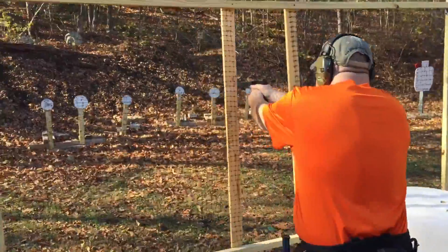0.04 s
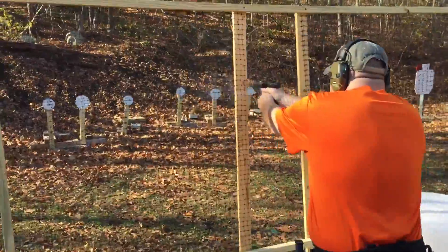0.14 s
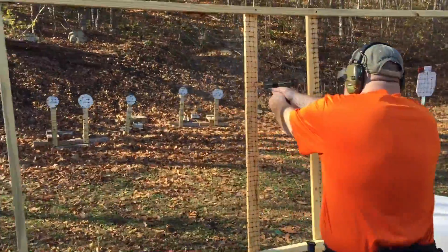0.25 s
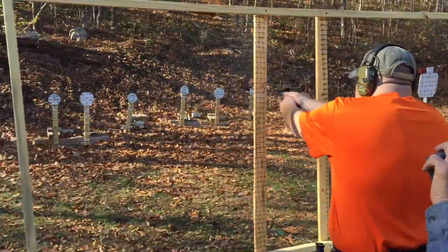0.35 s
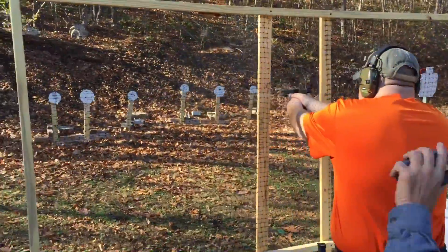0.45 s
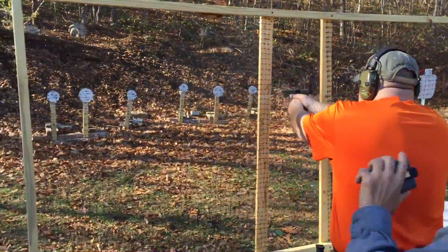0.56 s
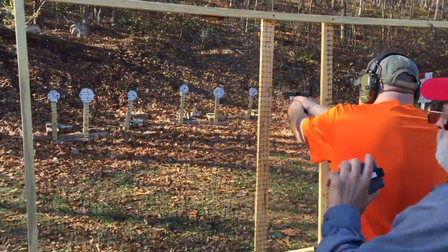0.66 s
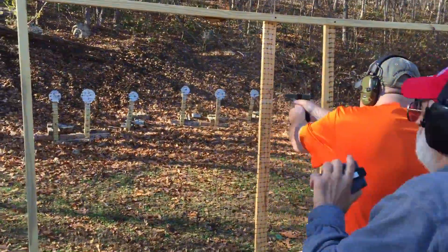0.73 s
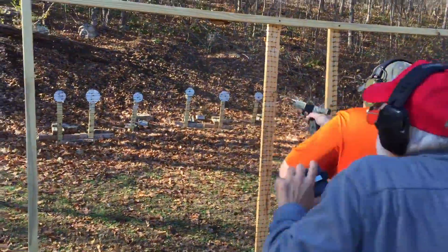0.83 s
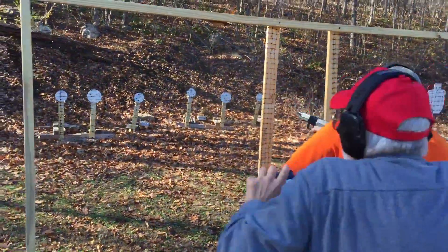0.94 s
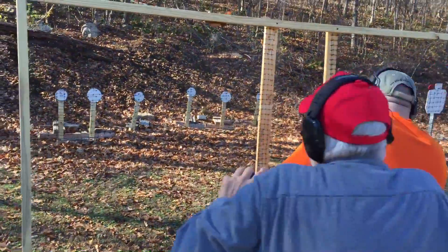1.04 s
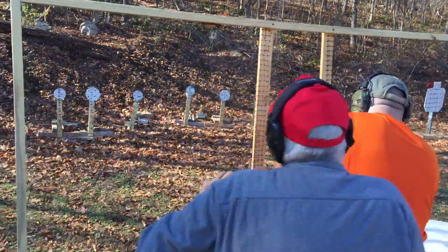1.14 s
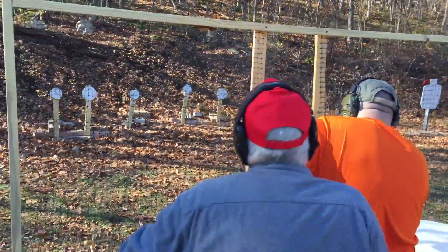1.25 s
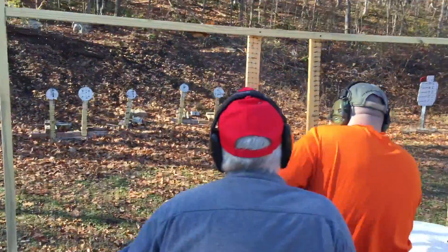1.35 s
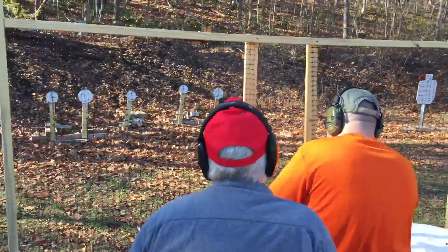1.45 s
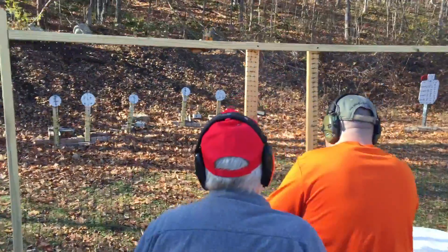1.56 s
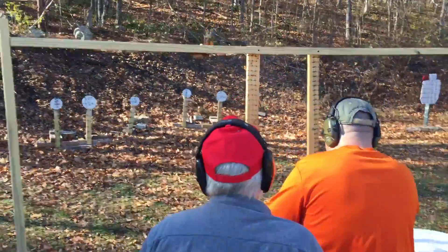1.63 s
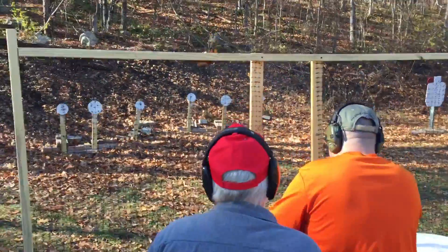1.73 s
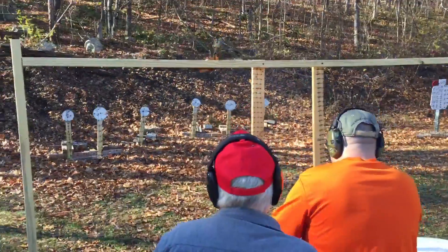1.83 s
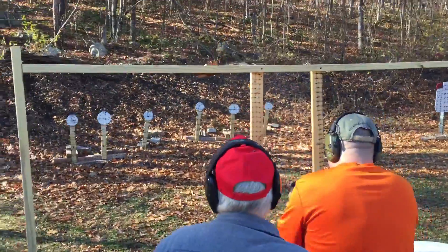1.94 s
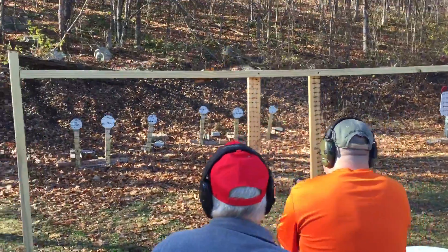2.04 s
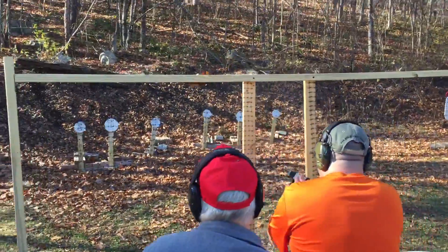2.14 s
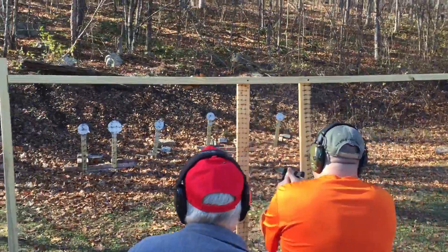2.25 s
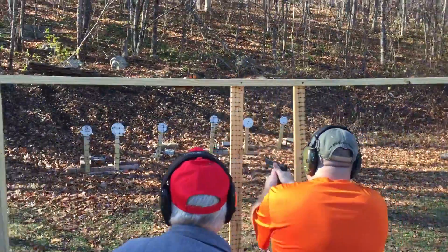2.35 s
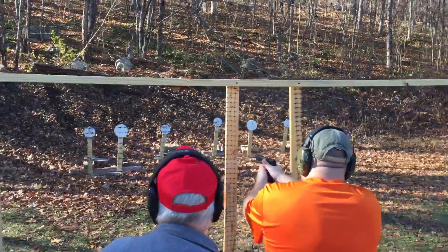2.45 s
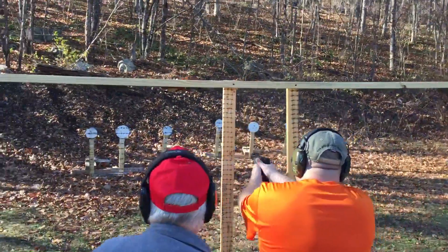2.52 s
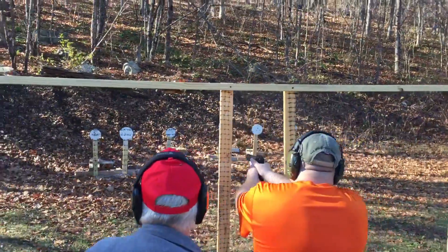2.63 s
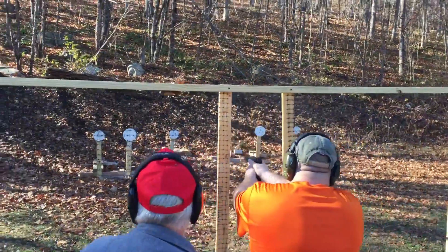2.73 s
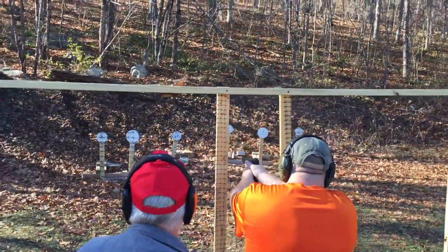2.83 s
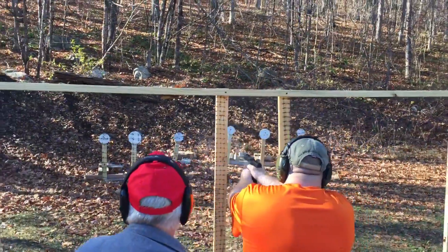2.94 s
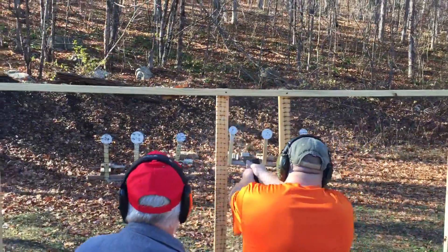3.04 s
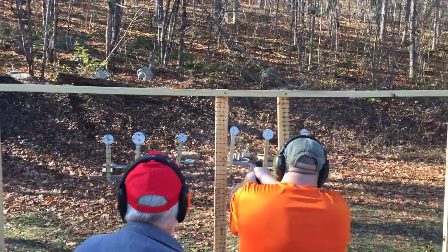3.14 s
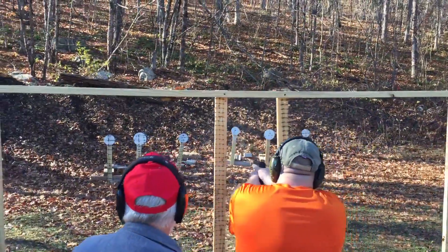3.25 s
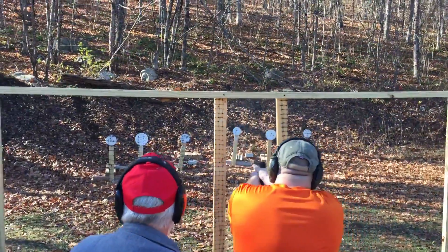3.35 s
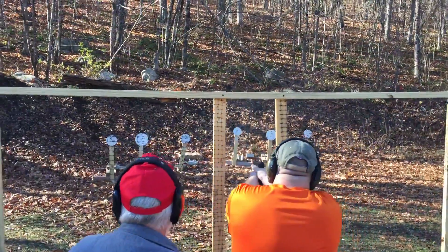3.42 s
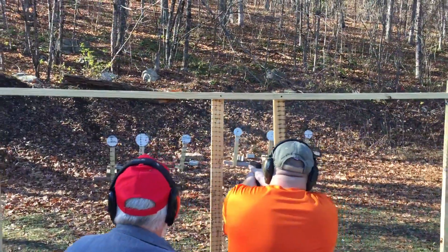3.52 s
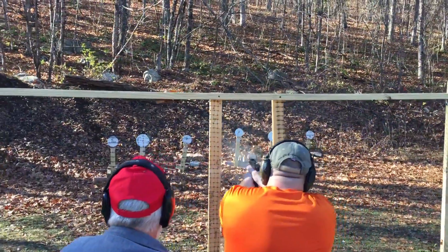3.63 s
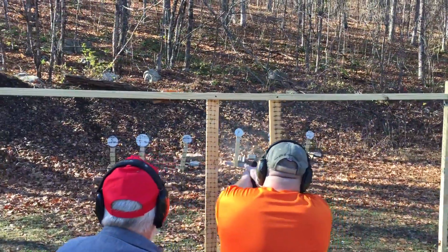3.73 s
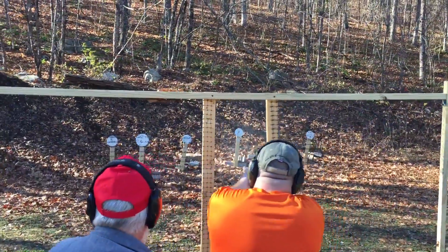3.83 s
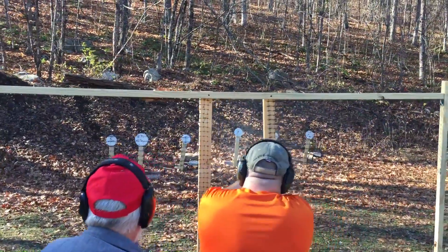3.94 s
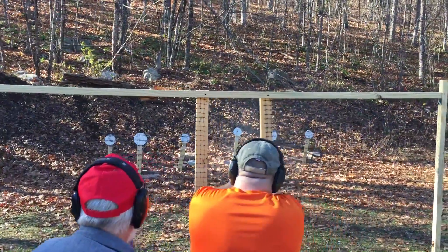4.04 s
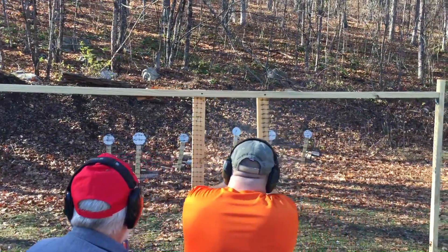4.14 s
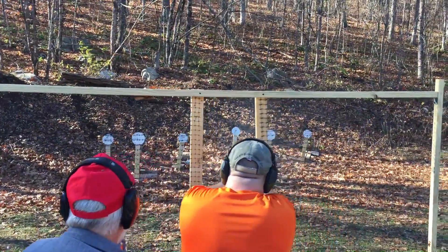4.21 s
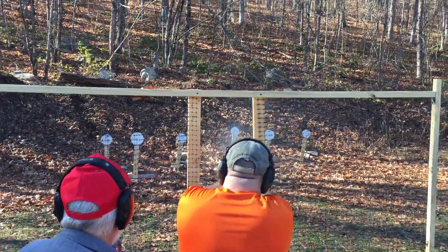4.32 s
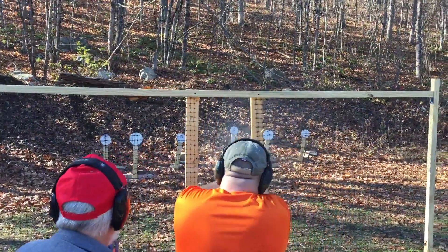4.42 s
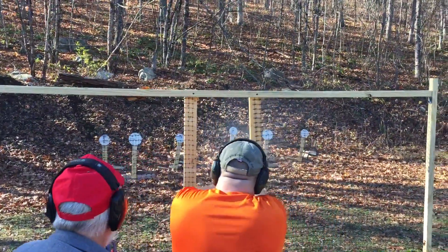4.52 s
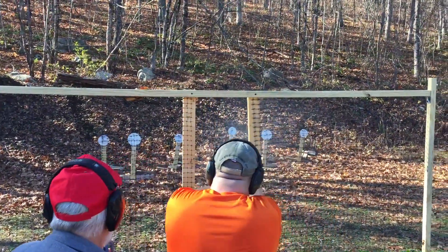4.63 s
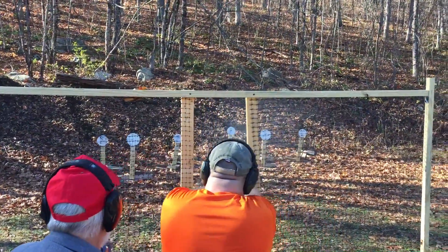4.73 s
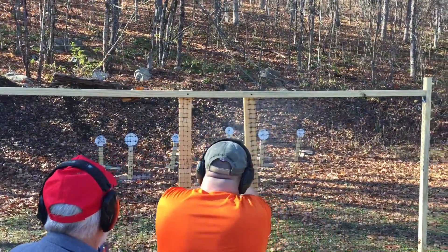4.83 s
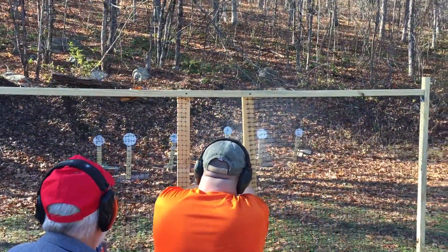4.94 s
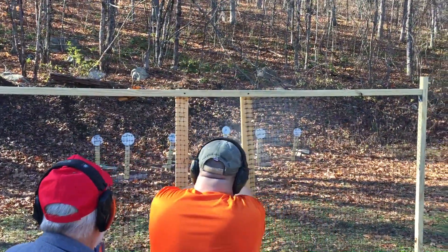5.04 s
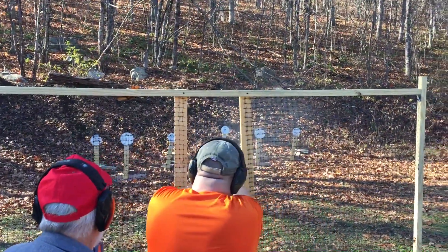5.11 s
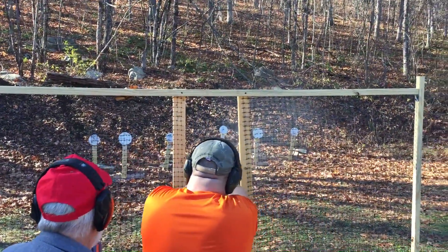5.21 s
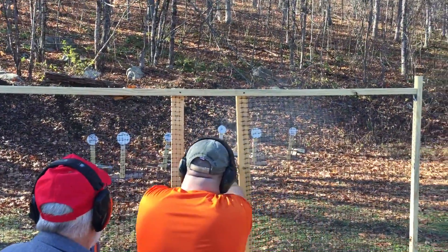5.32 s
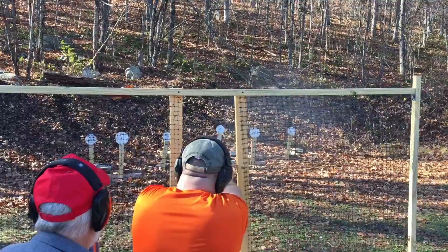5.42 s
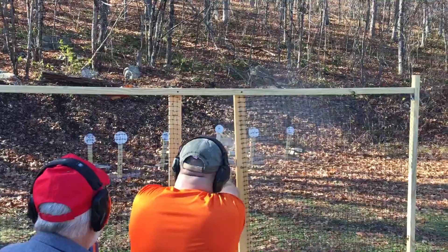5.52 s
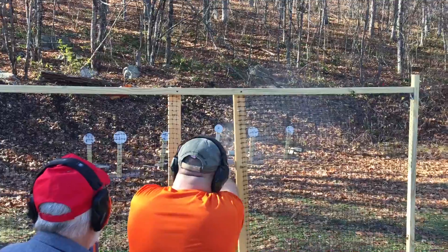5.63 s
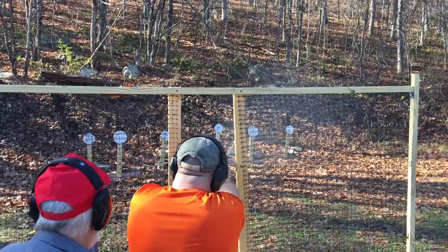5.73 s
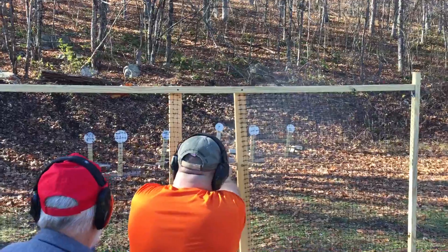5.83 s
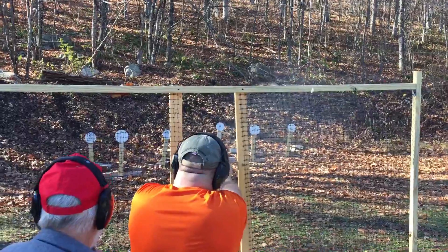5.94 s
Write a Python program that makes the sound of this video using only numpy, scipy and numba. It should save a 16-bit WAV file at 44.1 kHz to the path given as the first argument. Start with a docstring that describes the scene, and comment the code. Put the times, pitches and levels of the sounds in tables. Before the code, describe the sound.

Loud overloaded handgun shots with plate clangs and woodland echoes: one shot, a pause of handling clicks, then a steady string of five.

```python
"""Six pistol shots at an outdoor range, a few metres from a phone: shaped noise bands make blast, splash and echoes.
Each bullet rings a steel plate, built from beating modes; banks, woods and a far hillside return the blasts.
Between the strings the pistol is reloaded: gritty noise bursts, struck slide modes and dull grip knocks.
Behind lie an idling engine, pulses through a ringing exhaust, and road noise from filtered noise.
The shots overload the microphone; the gain control then ducks everything."""
import sys
import numpy as np
from scipy import signal
from scipy.fft import rfft, irfft
from scipy.io import wavfile
from scipy.ndimage import uniform_filter1d
from numba import njit

SR = 44100
rng = np.random.default_rng(int(sys.argv[2]) if len(sys.argv) > 2 else 0)


def dump_mix(stems):
    """Bounce the given channels to the path in sys.argv[1] as a 16-bit WAV at rate SR."""
    frames = np.atleast_2d(stems).T  # one column per channel
    limited = np.clip(frames, -1, 1)  # hard clip at full scale
    pcm = np.round(limited * 32767).astype(np.int16)
    wavfile.write(sys.argv[1], SR, pcm)


N = 263277


def amp(db):
    """Decibels to gain."""
    return 10 ** (np.asarray(db) / 20)


def add(out, start_s, piece):
    """Mix a piece in from start_s."""
    i = int(start_s * SR)
    out[i:i + len(piece)] += piece[:len(out) - i]


def fade(t60_s, rise_s):
    """Envelope that rises from zero and falls 60 dB per t60_s."""
    t = np.arange(int(1.6 * t60_s * SR)) / SR
    return (1 - np.exp(-t / rise_s)) * np.exp(-np.log(1000) * t / t60_s)


def ring(hz, t60_s, rise_s, beat_hz=0, twin=0):
    """One struck mode; a weaker twin beat_hz above makes it throb."""
    turn = 2 * np.pi * np.arange(int(1.6 * t60_s * SR)) / SR
    return fade(t60_s, rise_s) * (np.sin(hz * turn) + twin * np.sin((hz + beat_hz) * turn))


def band(hz, octaves):
    """Noise of rms 1 in a smooth band reaching octaves to each side of hz."""
    away = np.log2(np.maximum(np.fft.rfftfreq(N, 1 / SR), 1) / hz) / octaves
    gain = np.cos(np.pi / 2 * np.clip(away, -1, 1))
    x = irfft(rfft(rng.standard_normal(N)) * gain, N)
    return x / x.std()


def walk(rate_hz):
    """Random levels, rate_hz per second, joined by ramps; spread near 1."""
    hold = int(SR / rate_hz)
    steps = np.repeat(rng.standard_normal(N // hold + 1), hold)
    return uniform_filter1d(steps, hold)[:N]


def along(table, hz):
    """Columns of a band table, interpolated at hz over log frequency."""
    table_hz, *columns = np.transpose(table)
    return [np.interp(np.log(hz), np.log(table_hz), c) for c in columns]


@njit
def follow(x, attack, release):
    """Level detector with separate rise and fall rates (share per sample)."""
    e, out = 1e-6, np.empty(len(x))
    for i in range(len(x)):
        e += (abs(x[i]) - e) * (attack if abs(x[i]) > e else release)
        out[i] = e
    return out


# wash spectrum before levelling: pitch_hz, density_db_per_hz
ROAD_SPECTRUM = [(18, -54.5), (45, -35), (84, -9.5), (239, -25.5), (374, -26), (600, -30.5), (801, -23.5),
                 (1130, -28), (1910, -37.5), (3580, -41.5), (16000, -55)]
# tyre noise over time: time_s, centre_hz, level_db
TYRE_DRIFT = [(0, 1350, -58), (0.298, 1304, -50.5), (1.599, 994, -61), (2.299, 1155, -57.5),
              (2.701, 1326, -58.5), (3.0, 1360, -58), (6, 1313, -69)]
WASH_DB = -55.5
TYRE_SPREAD_HZ, TYRE_OCTAVES = 70, 3.5


def road():
    """Far traffic: a steady wash, and low noise shifted up by a carrier that drifts in pitch."""
    wash = np.zeros(N)
    for hz in 35 * 2 ** np.arange(0, 9, .75):
        level_db = along(ROAD_SPECTRUM, hz)[0] + 1.5 * walk(5)
        wash += amp(level_db) * np.sqrt(hz) * band(hz, .75)  # sqrt(hz): bandwidth grows with hz
    time_s, centre_hz, tyre_db = np.transpose(TYRE_DRIFT)
    t = np.arange(N) / SR
    carrier = np.sin(2 * np.pi * np.cumsum(np.interp(t, time_s, centre_hz)) / SR)
    tyres = band(TYRE_SPREAD_HZ, TYRE_OCTAVES) * np.sqrt(2) * carrier
    return wash / wash.std() * amp(WASH_DB) + tyres * amp(np.interp(t, time_s, tyre_db))


# engine level over time: time_s, level_db
ENGINE_LEVEL = [(0, -44.5), (1.501, -46.5), (2.399, -47), (2.799, -44.5), (4.2, -46.5), (6, -43)]
# exhaust resonances: pitch_hz, level_db, t60_s
EXHAUST_MODES = [(80.3, 0, 0.4), (119, -14, 0.45), (177, -14, 0.8)]
MEAN_FIRINGS_PER_S = 13.3


def engine():
    """Slow uneven firings of an idling engine ring its exhaust."""
    firings = np.cumsum(MEAN_FIRINGS_PER_S * (1 + 0.027 * walk(2.8))) / SR
    pulses = np.diff(np.floor(firings), prepend=0) * amp(1.9 * walk(8.3))
    pipe = np.zeros(SR)
    for hz, mode_db, t60_s in EXHAUST_MODES:
        add(pipe, 0, amp(mode_db) * ring(hz, t60_s, .01))
    x = signal.fftconvolve(pulses, pipe)[:N]
    return x / x.std() * amp(np.interp(np.arange(N) / SR, *np.transpose(ENGINE_LEVEL)))


# dull knocks of the grip: start_s, level_db
KNOCKS = [(1.531, -17), (2.009, -47.5), (2.0756, -37), (2.4676, -32)]
KNOCK_HZ, KNOCK_T60_S = 225, .04


def grip_knocks():
    """Each knock is one short low mode."""
    out = np.zeros(N)
    for start_s, level_db in KNOCKS:
        add(out, start_s, amp(level_db) * ring(KNOCK_HZ, KNOCK_T60_S, 0.00067))
    return out


# resonances of the slide: pitch_hz, level_db
SLIDE_MODES = [(2400, -4), (3413, 2.5), (5286, -7.5), (6250, -1), (7601, -11), (9324, -5), (10600, -5.5)]
# metal clicks of magazine and slide: start_s, level_db, centre_hz, t60_s
CLICKS = [(1.056, -27.5, 8930, 0.02), (1.266, -42, 8100, 0.12), (1.301, -36.5, 6900, 0.066),
          (1.5286, -25, 4150, 0.14), (1.866, -40, 6020, 0.05), (2.0685, -29, 4900, 0.046),
          (2.074, -13.5, 4260, 0.069), (2.369, -46, 4880, 0.0097), (2.4157, -40, 6500, 0.06),
          (2.4436, -14, 4840, 0.14), (2.4587, -9.5, 5050, 0.019), (2.4664, 5, 5620, 0.044),
          (2.736, -44, 3080, 0.017), (2.85, -49, 3550, .029), (4.3579, -1, 3900, 0.098)]
STRIKE_DB, STRIKE_T60_S = -16.5, 0.046  # re click
SLIDE_RING_DB, SLIDE_T60_S = -63, 1  # re click


def slide_rings():
    """Each click strikes the slide's modes, strongest near its centre, and leaves a faint noisy ring."""
    clanks, ringing = np.zeros((2, N))
    for start_s, level_db, centre_hz, _ in CLICKS:
        for hz, mode_db in SLIDE_MODES:
            strike_db = level_db + STRIKE_DB + mode_db - 3.0 * np.log2(hz / centre_hz) ** 2
            add(clanks, start_s, amp(strike_db) * ring(hz, STRIKE_T60_S, 0.00036, 0.023 * hz, 0.8))
        add(ringing, start_s, amp(level_db + SLIDE_RING_DB) * fade(SLIDE_T60_S, .002))
    return clanks + ringing * sum(amp(db) * band(hz, .04) for hz, db in SLIDE_MODES)


# rustles of hands and cloth: start_s, level_db, centre_hz
RUSTLES = [(1.356, -29, 7100), (2.006, -24.5, 3420), (2.687, -36.5, 4970)]
# short hiss just before the first blast of each string: start_s, level_db, centre_hz
HISSES = [(0.2346, -11, 6220), (3.0207, -13, 4440)]
CLICK_RISE_S = 0.00027
RUSTLE_RISE_S, RUSTLE_T60_S = 0.018, .1
HISS_RISE_S, HISS_T60_S = 0.0024, 0.029


def grit_bursts():
    """Clicks, rustles and hisses: gritty noise and steel resonances, weighted around each centre pitch."""
    out = np.zeros(N)
    grit = [(hz, band(hz, 1.1) * amp(3.0 * walk(500))) for hz in (350, 700, 1400, 2800, 5600, 11200)]
    grit += [(hz, amp(db - 9.5) * band(hz, 0.17)) for hz, db in SLIDE_MODES]
    events = [(s, db, hz, CLICK_RISE_S, t60_s) for s, db, hz, t60_s in CLICKS]
    events += [(*row, RUSTLE_RISE_S, RUSTLE_T60_S) for row in RUSTLES]
    events += [(*row, HISS_RISE_S, HISS_T60_S) for row in HISSES]
    for start_s, level_db, centre_hz, rise_s, t60_s in events:
        shape = np.zeros(N)
        add(shape, start_s, amp(level_db) / 3 * fade(t60_s, rise_s))
        add(shape, start_s, amp(level_db - 41) * fade(7.0 * t60_s, 0.028))  # faint tail
        out += shape * sum(g * amp(-4.0 * np.log2(hz / centre_hz) ** 2) for hz, g in grit)
    return out


A, B, C, D = range(4)  # the four plates
# mode pitches, one row per plate: pitch_hz
PLATE_PITCHES = [
    [2041, 2816, 4570, 4867, 6891, 7316, 8409, 10140, 11830, 13310, 14600],
    [1314, 2975, 3165, 5030, 5502, 6718, 7418, 8400, 8769, 10090, 11180, 11590, 12010, 13000, 13940, 14980],
    [2058, 4585, 7735, 8430, 10200, 11300, 12330, 12670, 12805, 13020, 13360, 14730, 15420],
    [2062, 4603, 7720, 8419, 9200, 9800, 11290, 12320, 12820, 13390, 13880, 14840, 15430],
]
# modes, one list per plate: centre_hit_db, rim_hit_db, t60_s, afterring_db, afterring_t60_s
PLATE_MODES = [
    [(-5, -5, 0.28, -35, 1.5), (-22.5, -22.5, 0.3, -20, 1.7), (-21, -22, 0.2, -27, 0.96),
     (-25, -25, 0.37, -17.5, 1.2), (-22.5, -21.5, .2, -41, .6), (-3, -3, 0.18, -36, 0.95),
     (-22, -22, .3, -39, .6), (-5, -5, 0.073, -29.5, 0.65), (-25, -25, 0.22, -43, .5),
     (-10.5, -10.5, 0.2, -44, .4), (-23, -23, .15, -38, .4)],
    [(-46.5, 18.5, 0.16, -49, .6), (-4, -23, 0.25, -8, 2.2), (-24, -17, .3, -8, 2.3),
     (-12.5, -13, 0.2, -9, 0.87), (-9, -28, .3, -44.5, .6), (-35, -16, .2, -14, 1.6),
     (-8, -28, 0.43, -13, 1.47), (3, -18, 0.41, -8, 1.07), (-50.5, -5, 0.66, -28, .6),
     (-2.5, -8.5, 0.24, -53.5, 0.44), (-48.5, -20, .15, -44, .5), (-4.5, -8, 0.33, -30, 0.73),
     (-33, -27.5, .25, -38, .5), (6, -29.5, .24, -33, 0.46), (-27, -26, .12, -52.5, .4),
     (-19.5, -21, .15, -45, .4)],
    [(3, 1.5, 0.35, -32, 1.4), (14, -4.5, 0.12, -13.5, 1.08), (-10.5, -26, 0.53, -26.5, 0.87),
     (-31, 9, 0.3, -28, 1.3), (-34, -36, 0.36, -40, 0.94), (0.5, -37, 0.44, -57, 0.61),
     (-22, -30, .18, -16, .5), (-40.5, 26, 0.26, -49, .4), (-19, -14.5, 0.41, -13.5, 1.67),
     (-32, -6, 0.117, -42, .4), (-24, -22, 0.22, -38.5, .5), (-23, -18, 0.098, -45, .3),
     (-20, -19, 0.096, -44, .3)],
    [(3.5, 3, 0.11, -26, 1.1), (1.5, 1.5, 0.095, -11, 1.9), (6.5, 7, 0.12, -22, 0.56),
     (2, 2, 0.11, -30, 0.24), (-25, -28, 0.39, -6, 0.86), (-14, -14, 0.073, -18, .35),
     (-18, -15, 0.17, -30, .5), (3, -6, .1, -30, .4), (13, 12, 0.07, -22, 0.51), (-14, -14, 0.14, -30, .4),
     (-14, -14, .1, -30, .3), (-14, -14, .12, -30, .3), (-14, -14, .12, -30, .3)],
]
# bullet hits: start_s, plate, splash_db, ring_db, off_centre (0-1), detune_percent, afterring_db,
# twin_share (negative = afterring starts in opposition), wobble_hz, first_swell_s (after the hit),
# wobble_db, input_swing_db
HITS = [(0.2947, A, 15.2, 20.2, .5, -0.022, 4.5, 0.23, 8.8, 0.017, 0.83, -6),
        (3.084, B, 15, 8.2, 0.084, 0.15, -14.5, -0.028, 8.4, 0.017, 7.7, -6),
        (3.7646, C, 13.6, 9.1, 0.64, 0.4, -3.5, 0.13, 12.6, 0.024, 5.3, -13.5),
        (4.452, C, 13.3, 13.9, 0.46, -0.16, -13, -0.034, 17.6, 0.04, 3.5, -24),
        (5.045, B, 12.5, 5.4, 0.81, -0.167, 7.9, 0.068, 9.4, 0.013, 3.9, -32),
        (5.667, D, 12.7, 6.7, .5, 0.032, -0.5, -0.79, 5, 0.073, 2.1, -13)]
BEAT_SHARE = .0016  # twin spacing / pitch
ROCK_DB = 2.5  # flutter of the hanging plate


def plates():
    """Each hit rings its plate's modes; where it lands sets their balance, the post damps the first burst."""
    out, t = np.zeros(N), np.arange(2 * SR) / SR
    for start_s, plate, _, ring_db, rim, detune, free_db, twin, wobble_hz, first_s, wobble_db, _ in HITS:
        # the struck plate wobbles and swings its treble past the listener
        beam_db = wobble_db * np.cos(2 * np.pi * wobble_hz * (t - first_s))
        rim_share = np.clip(rim, 0, 1)
        for hz, mode in zip(PLATE_PITCHES[plate], PLATE_MODES[plate]):
            centre_db, rim_db, t60_s, after_db, after_t60_s = mode
            pitch_hz, beat_hz = hz * (1 + detune / 100), BEAT_SHARE * hz
            sound = np.zeros(len(t))
            add(sound, 0, amp(after_db + free_db) * ring(pitch_hz, after_t60_s, .015, beat_hz, twin))
            sound *= amp(ROCK_DB * walk(25)[:len(t)])
            add(sound, 0, ring(pitch_hz, t60_s, 0.0083, beat_hz, abs(twin)))
            # short waves beam more narrowly, so high modes wobble more
            beam = amp(beam_db * min(hz / 5000, 1))
            mode_db = ring_db + centre_db + rim_share * (rim_db - centre_db)
            add(out, start_s, sound * beam * amp(mode_db))
    return out


# shots: start_s, blast_db, blast_t60_s, bank_echo_db, far_boom_db, input_swing_db, warble_db
SHOTS = [(0.256, 17.5, 0.24, 19.5, -27.5, -1.5, 0), (3.0426, 39, 0.054, 19.5, -30, -5.5, -1.5),
         (3.7198, 30, 0.058, 12, -39, -12, -16), (4.4046, 39.5, 0.026, 13.5, -44, -10, -9.5),
         (4.995, 42.5, 0.028, 11, -56, -14.5, -17), (5.6132, 35.5, 0.044, 12.5, -49, -12, -11)]
# far hillside: delay_s (to the middle of the boom), pitch_hz, half_length_s
FAR_ECHO = (0.42, 138, 0.066)


def far_booms():
    """A far hillside returns only a dull boom."""
    out = np.zeros(N)
    delay_s, hz, half_s = FAR_ECHO
    t = np.arange(int(4 * half_s * SR)) / SR - 2 * half_s
    boom = np.exp(-(t / half_s) ** 4) * np.sin(2 * np.pi * hz * t)
    for start_s, *_, boom_db, _, _ in SHOTS:
        add(out, start_s + delay_s - 2 * half_s, amp(boom_db) * boom)
    return out


# by band: pitch_hz, blast_db, splash_db, bank_db, bank_t60_s, woods_db, woods_t60_s
AIR_BANDS = [(39.8, -23, -18.5, -24.5, 0.12, -46.5, 1.8), (126.1, -23, -22.5, -48.5, 0.22, -51, 1.8),
             (327, -9.5, -17.5, -16.5, 0.5, -20, 1.54), (815, -9.5, -4.5, -11.5, 0.36, -15.5, 1.726),
             (2180, -13.5, -2, -7.5, 0.23, -16, 1.425), (3800, -8, -3.5, -16, 0.34, -16, 1.045),
             (7700, -20, -8.5, -6, 0.2, -18.5, 0.52), (14000, -21.5, -7, -16.5, 0.27, -29, 0.14)]
SPLASH_T60_S = 0.061
BERM_DELAY_S, BERM_DB, BERM_T60_S = .103, -2, 0.025  # slap off the earth wall; level re banks
WOODS_DB = 9
FAR_WOODS_DELAY_S, FAR_WOODS_DB, FAR_WOODS_RISE_S = 0.24, -7, 0.09  # farther tree line; level re near trees
SLAP_DB, ROLL_DB = 4, 1.3  # unevenness of the near echoes, slow surges of the woods


def blasts():
    """Muzzle blast, bullet splash, bank echoes and the roll of the woods: energies summed band by band."""
    out, slaps, rolls = np.zeros(N), walk(70), walk(12)
    for hz in 35 * 2 ** np.arange(0, 9, .5):
        blast_db, splash_db, bank_db, bank_t60_s, woods_db, woods_t60_s = along(AIR_BANDS, hz)
        trees_db = WOODS_DB + woods_db
        direct, banks, woods = np.zeros((3, N))  # energy envelopes
        for s, db, t60_s, echo_db, *_ in SHOTS:
            blast = amp(db + blast_db) * fade(t60_s, 0.000067)
            bank = amp(echo_db + bank_db) * fade(bank_t60_s, 0.0017)
            berm = amp(echo_db + BERM_DB + bank_db) * fade(BERM_T60_S, 0.0019)
            near_trees = amp(trees_db) * fade(woods_t60_s, 0.16)
            far_trees = amp(trees_db + FAR_WOODS_DB) * fade(woods_t60_s, FAR_WOODS_RISE_S)
            add(direct, s, blast ** 2)
            add(direct, s + BERM_DELAY_S, berm ** 2)
            add(banks, s, bank ** 2)
            add(woods, s, near_trees ** 2)
            add(woods, s + FAR_WOODS_DELAY_S, far_trees ** 2)
        for s, _, db, *_ in HITS:
            add(direct, s, (amp(db + splash_db) * fade(SPLASH_T60_S, 0.00015)) ** 2)
            add(banks, s, (amp(db + bank_db) * fade(bank_t60_s, 0.047)) ** 2)
        # near echoes arrive as separate slaps; the many trunks of the woods blend more smoothly
        bank_gain = amp(SLAP_DB * slaps)
        woods_gain = amp(2.3 * slaps + ROLL_DB * (rolls + 2 * walk(25)))
        out += np.sqrt(direct + banks * bank_gain + woods * woods_gain) * band(hz, 0.55)
    return out + far_booms()


def scene():
    """Sum of all sources, one channel."""
    small_sounds = grip_knocks() + slide_rings() + grit_bursts()
    return (road() + engine() + small_sounds + plates() + blasts())[None]


WARBLE_HZ, WARBLE_LEAD_S = 555, 0.023


def warble():
    """A muffled low warble swells just before each blast: a rising ramp on band noise."""
    swell = np.zeros(N)
    ramp = np.linspace(0, 1, int(WARBLE_LEAD_S * SR)) ** 1.9
    for start_s, *_, level_db in SHOTS:
        add(swell, start_s - WARBLE_LEAD_S, amp(level_db) * ramp)
    return swell * band(WARBLE_HZ, 1.67)


SWING_END_HZ, SWING_S, SWING_GLIDE_S, SWING_RISE_S = 32, 0.019, 0.0074, 0.0028


def swing(start_hz):
    """A bass swing that slows and dies within about two turns."""
    t = np.arange(int(3 * SWING_S * SR)) / SR
    hz = SWING_END_HZ + (start_hz - SWING_END_HZ) * np.exp(-t / SWING_GLIDE_S)
    envelope = (1 - np.exp(-t / SWING_RISE_S)) * np.exp(-(t / SWING_S) ** 2)
    return envelope * np.sin(2 * np.pi * np.cumsum(hz) / SR)


# input swing after a blast: delay_s, start_hz
BLAST_SWING = (0.011, 150)
# input swing after a hit: delay_s, start_hz
HIT_SWING = (.0012, 210)
THUMP_HZ, THUMP_T60_S, THUMP_DB = 190, 0.07, 0  # first thump of the blast; level re its swing
GAIN_ATTACK_S, GAIN_RELEASE_S = .3, .12
BASS_CUT_HZ, TOP_HZ = 55, 16000  # the small microphone hears little below; cut at the top


def record(dry):
    """Gain control, overload, the slow swing back of the overloaded input, and the cut at the top."""
    level = follow(dry[0], 1 / (GAIN_ATTACK_S * SR), 1 / (GAIN_RELEASE_S * SR))
    level_db = 20 * np.log10(level)
    bass_cut = signal.butter(2, BASS_CUT_HZ, "high", fs=SR, output="sos")
    duck_db = np.clip(0.76 * (level_db + 38.5), 0, 22)
    x = signal.sosfilt(bass_cut, dry[0]) * amp(-duck_db)
    x = np.clip(x + warble(), -.95, .95)
    delay_s, start_hz = BLAST_SWING
    for s, *_, swing_db, _ in SHOTS:
        add(x, s, amp(swing_db + THUMP_DB) * ring(THUMP_HZ, THUMP_T60_S, 0.0013))
        add(x, s + delay_s, amp(swing_db) * swing(start_hz))
    delay_s, start_hz = HIT_SWING
    for s, *_, swing_db in HITS:
        add(x, s + delay_s, amp(swing_db) * swing(start_hz))
    x = np.clip(x, -.88, .88)
    top_cut = signal.ellip(12, .2, 90, TOP_HZ, fs=SR, output="sos")
    return signal.sosfilt(top_cut, x)[None]


dry = scene()
out = record(dry)
dump_mix(out)
```